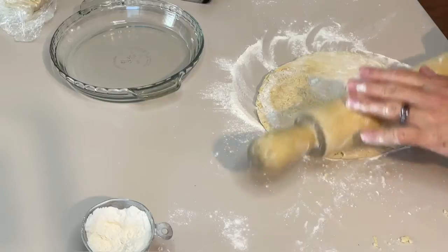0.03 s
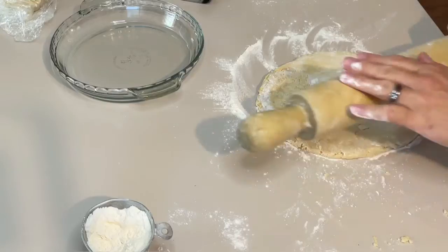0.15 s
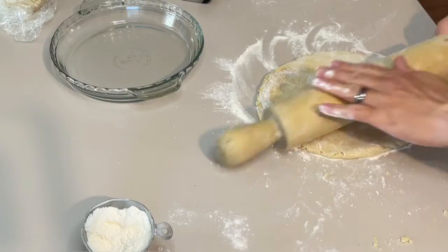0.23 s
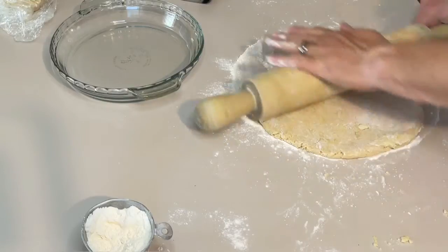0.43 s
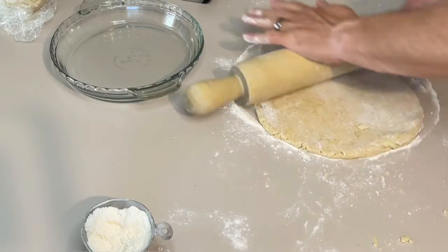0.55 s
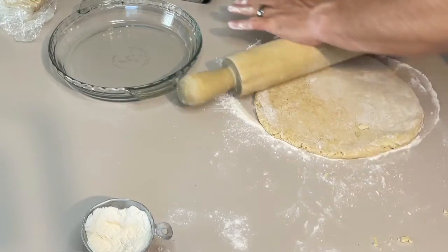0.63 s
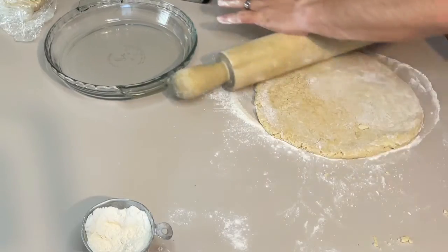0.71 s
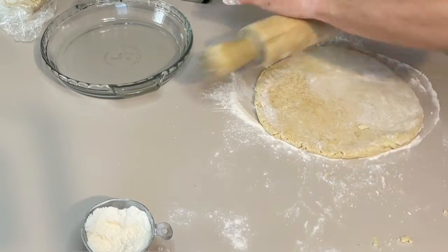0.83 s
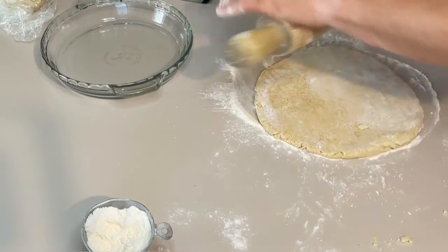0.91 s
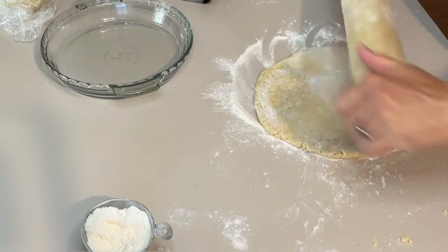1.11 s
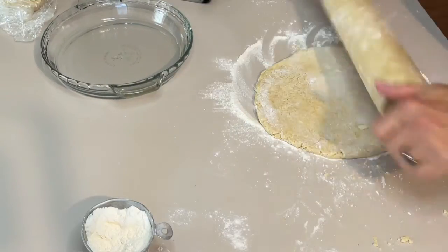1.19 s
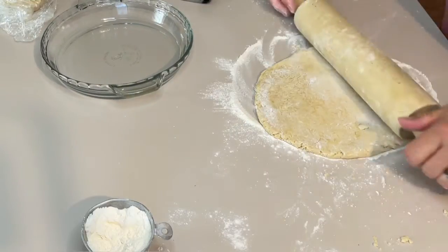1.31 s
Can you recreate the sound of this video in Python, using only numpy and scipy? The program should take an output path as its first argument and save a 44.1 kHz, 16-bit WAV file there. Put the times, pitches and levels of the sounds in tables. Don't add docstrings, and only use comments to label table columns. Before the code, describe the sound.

Close by in a kitchen, a rolling pin thumps the countertop twice in quick succession, then knocks once with a hollow woody ring, followed by soft dough-and-flour rustling and brief hand rubs over a low appliance hum.

```python
import sys
import numpy as np
from scipy import signal
from scipy.fft import rfft, irfft, next_fast_len
from scipy.io import wavfile

SR = 44100
rng = np.random.default_rng(int(sys.argv[2]) if len(sys.argv) > 2 else 0)


def gain_from_db(level_db):
    decades = np.asarray(level_db, float) / 20
    return 10 ** decades


def file_out(sig):
    cols = np.atleast_2d(sig).T
    lim = np.clip(cols, -1, 1)
    pcm = np.round(lim * 32767).astype(np.int16)
    wavfile.write(sys.argv[1], SR, pcm)


N = 59535


def rms_one(x):
    return x / np.sqrt(np.mean(x ** 2) + 1e-20)


def in_time(rows, outside=None):
    s, *columns = np.transpose(rows)
    return [np.interp(np.arange(N) / SR, s, column, left=outside) for column in columns]


def at_hz(points, hz):
    table_hz, value = np.transpose(points)
    return np.interp(np.log(hz), np.log(table_hz), value)


def drift(rate_hz):
    every = 40
    pole = np.exp(-2 * np.pi * rate_hz * every / SR)
    settle = 2000
    white = rng.standard_normal(N // every + 2 + settle)
    slow = rms_one(signal.lfilter([1], [1, -2 * pole, pole * pole], white)[settle:])
    return np.interp(np.arange(N) / every, np.arange(len(slow)), slow)


def ring(x, hz, t60):
    radius = gain_from_db(-60 / (t60 * SR))
    w = 2 * np.pi * hz / SR
    return signal.lfilter([0, np.sin(w)], [1, -2 * radius * np.cos(w), radius * radius], x + 1e-18)


def body(x, modes, turn=-1):
    return sum(gain_from_db(db) * ring(x, hz, t60) * turn ** k for k, (hz, db, t60) in enumerate(modes))


def pushes(rows):
    force = np.zeros(N + SR)
    t = np.arange(SR // 10) / SR
    for s, db, soft_hz in rows:
        push = t ** 2 * np.exp(-3 * np.pi * soft_hz * t)
        force[int(s * SR):][:len(t)] -= gain_from_db(db) * push / push.sum()
    return force[:N]


# f/Hz, correlation [1]
LIKENESS = [(60, .99), (270, .85), (590, .4), (1260, .6), (2690, .75), (5000, .85), (7000, .99),
            (9000, .999)]


def stereo_band(white, low, high):
    band = signal.butter(2, [low, high], "band", fs=SR, output="sos")
    mid, side = signal.sosfilt(band, white)
    alike = at_hz(LIKENESS, np.sqrt(low * high))
    return np.sqrt(1 + alike) * mid + np.sqrt(1 - alike) * side * [[1], [-1]]


def banded(white, spectrum, patchy_db):
    out = 0
    edges = 25 * 2 ** np.arange(0, 9.6, .5)
    for k, (low, high) in enumerate(zip(edges, edges[1:])):
        level_db = at_hz(spectrum, np.sqrt(low * high)) + patchy_db * drift(9)
        out = out + gain_from_db(level_db) * stereo_band(white[k % 2], low, high)
    return rms_one(out)


# f/Hz, density/dB per Hz
AIR = [(30, 5.5), (69, -5.5), (160, -3), (397, -10), (787, -30.5), (2200, -30), (3200, -59), (4500, -44)]
# f/Hz, rms level/dB
HUM = [(78.5, -64.5), (157, -66.5), (236, -72.5), (314, -65)]
# f/Hz, width/Hz, rms level/dB
WHINE = (2400, 60, -78)


def background():
    t = np.arange(N) / SR
    hum = 0
    for hz, db in HUM:
        phase = rng.random()
        hum = hum + np.sqrt(2) * gain_from_db(db + drift(4.3)) * np.sin(2 * np.pi * (hz * t + phase))
    whine_hz, width_hz, whine_db = WHINE
    whine = gain_from_db(whine_db) * rms_one(ring(rng.standard_normal(N), whine_hz, 2.2 / width_hz))
    air_db = -53
    air = gain_from_db(air_db) * banded(rng.standard_normal((2, 2, N)), AIR, patchy_db=-2.5)
    return air + hum + whine


def grains(per_s):
    struck = rng.random((2, 2, N)) < per_s / SR
    return struck * rng.standard_normal((2, 2, N))


# t/s, hiss level/dB, coarseness/dB
SLIDE = [(0.0, -70, -16), (0.184, -73, 6.5), (0.22, -69.5, 10), (0.232, -52, -34), (0.248, -48.5, 20.5),
         (0.292, -52.5, -46), (0.352, -52.5, 5.5), (0.454, -64, 12), (0.57, -64.5, 2.5), (0.596, -62.5, 21),
         (0.718, -59, 23.5), (0.782, -66, 14.5), (0.894, -56.5, 1), (0.92, -65.5, 5), (0.936, -49.5, -2),
         (1.108, -59, -11), (1.146, -52.5, -12), (1.35, -60.5, -21)]
# f/Hz, density/dB per Hz
FLOUR = [(1500, -14.5), (3000, -10), (5000, -10.5), (7000, -0.5), (9000, -21.5), (10500, 1.5), (11500, 0),
         (13000, -5.5)]
# f/Hz, density/dB per Hz
CRUMBS = [(400, 5), (900, 10), (1800, 6.5), (3200, -2), (5000, -14), (7000, 2), (10000, -65)]


def flour():
    flour_db, crumbs_db = 3, -5.5
    hiss_db, coarse_db = in_time(SLIDE)
    fine = gain_from_db(flour_db) * banded(grains(per_s=13000), FLOUR, patchy_db=2.0)
    coarse = gain_from_db(crumbs_db + coarse_db) * banded(grains(per_s=1500), CRUMBS, patchy_db=0.8)
    return gain_from_db(hiss_db) * (fine + coarse)


# t/s, counter level/dB, pin level/dB, crack level/dB, contact softness f/Hz
KNOCKS = [
    (.2288, -79, -92, -28.5, 1990),
    (0.2343, -17, -22.5, -9, 1570),
    (0.2478, -20.5, -31, -8, 1760),
    (0.2573, -27, -55, -28, 5000),
    (0.5895, -25.5, -12.5, -19.5, 1970),
]
# f/Hz, level/dB, t60/s
COUNTER = [(240.8, 3.5, 0.064), (279.3, -10.5, 0.29), (318.5, 1, 0.054), (361, -11.5, 0.21),
           (453, -1.5, 0.033)]
# f/Hz, level/dB, t60/s
PIN = [(457, -7.5, 0.02), (575, -9.5, 0.091), (699.5, 0, 0.064), (707.8, -4.5, 0.11), (800, -18, 0.126),
       (1044, -13, 0.045), (1232, -8, 0.085), (1445, -14.5, 0.039), (1764, -8, 0.051), (2709, -12, 0.1),
       (3616, -21, 0.2), (4770, -54, .05), (5940, -26, 0.21), (6960, -28, 0.14)]
# f/Hz, level/dB, t60/s
CRACK = [(800, 0, .004), (1500, -3, .004), (2100, -6, .005), (3200, -15, .005)]
# t/s, cabinet level/dB, floor level/dB
THUMPS = [
    (0.229, -24.5, -63),
    (0.2346, -9, -13),
    (0.2515, -20, -23.5),
    (0.602, -36, -59),
    (0.648, -38, -53),
    (1.289, -61, -38.5),
    (1.340, -59, -46),
]
# f/Hz, level/dB, t60/s
CABINET = [(108.15, -6, 0.342), (125.4, 2.5, 0.123), (149.1, -3.5, 0.199), (183, -11.5, 0.13),
           (201, -17, 0.054)]
# f/Hz, level/dB, t60/s
FLOORBOARDS = [(64.8, -6, 0.54), (81.1, -3, 0.38)]


def knocks():
    top, pin, crack = (pushes([(row[0], row[k], row[4]) for row in KNOCKS]) for k in (1, 2, 3))
    small = body(top, COUNTER) + body(pin, PIN) + body(crack, CRACK, turn=1)
    thump_soft_hz = 230
    upper, deep = (-pushes([(row[0], row[k], thump_soft_hz) for row in THUMPS]) for k in (1, 2))
    boom = body(upper, CABINET, turn=1) + body(deep, FLOORBOARDS, turn=1)
    radiates = signal.butter(3, 191, "high", fs=SR, output="sos")
    return boom + signal.sosfilt(radiates, small)


# f/Hz, t60/s
ROOM_T60 = [(80, 0.2), (300, 0.44), (1000, 0.51), (3000, 0.46), (8000, 0.42)]
# f/Hz, level/dB
ROOM_COLOUR = [(60, -1.5), (150, 1), (500, 0.5), (2000, 0), (6000, -9)]


def kitchen(x):
    build_s = 0.0051
    t = np.arange(SR) / SR
    edges = 40 * 2 ** np.arange(0, 9, .5)
    white = rng.standard_normal((2, 2, SR))
    echo = 0
    for k, (low, high) in enumerate(zip(edges, edges[1:])):
        hz = np.sqrt(low * high)
        fade = gain_from_db(at_hz(ROOM_COLOUR, hz) - 60 * t / at_hz(ROOM_T60, hz))
        echo = echo + fade * stereo_band(white[k % 2], low, high)
    echo = echo * (1 - np.exp(-(t / build_s) ** 2)) / np.sqrt(SR / 20)
    return signal.fftconvolve(x[None], echo, axes=1)[:, :N]


# t/s, level/dB
RUB = [
    (.91, -94),
    (.95, -55),
    (1.0, -84),
    (1.06, -57),
    (1.1, -91),
    (1.15, -55.5),
    (1.23, -63.5),
    (1.27, -64),
    (1.31, -63),
]
# f/Hz, width/Hz, level/dB
RUB_BODY = [(1150, 170, 0), (1760, 260, 0), (2880, 160, -8), (3150, 130, -6)]
# t/s, level/dB, t60/s
FINGER_TICK = (.9768, -41, .022)


def rub():
    noise = rng.standard_normal(N) * gain_from_db(2 * drift(30))
    wood = 0
    for hz, width_hz, db in RUB_BODY:
        t60 = 1.4 / width_hz
        wood = wood + gain_from_db(db) * rms_one(ring(ring(noise, hz, t60), hz, t60))
    s, tick_db, tick_t60 = FINGER_TICK
    tick_modes = [(hz, 0, tick_t60) for hz, _, _ in RUB_BODY[:2]]
    tick = body(pushes([(s, tick_db, 2500)]), tick_modes)
    return gain_from_db(in_time(RUB, outside=-80)[0]) * rms_one(wood) + tick


def scene():
    room_db, pan_db = -4.5, .35
    near = knocks() + rub()
    mix = near + gain_from_db(room_db) * kitchen(near) + flour() + background()
    return mix * gain_from_db(np.array([[pan_db], [-pan_db]]))


def band_limit(x):
    return signal.sosfilt(signal.butter(12, 12900, fs=SR, output="sos"), x)


# f/Hz, lead of the left/radians
PORTS = [(0, 0), (3000, .4), (7700, .6), (8550, 0), (10250, -np.pi), (11900, -2 * np.pi), (12600, -7.1),
         (22050, -7.1)]


def record(dry):
    low_cut = signal.butter(4, 66, "high", fs=SR, output="sos")
    x = signal.sosfilt(low_cut, dry)
    size = next_fast_len(N + 2048)
    lead = np.interp(np.arange(size // 2 + 1) * SR / size, *np.transpose(PORTS))
    x = irfft(rfft(x, size) * np.exp(.5j * lead * [[1], [-1]]), size)[:, :N]
    top_cut = signal.cheby2(10, 50, 13000, fs=SR, output="sos")
    return band_limit(signal.sosfilt(top_cut, x))


dry = scene()
out = record(dry)
file_out(out)
```